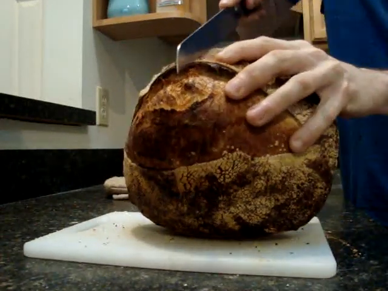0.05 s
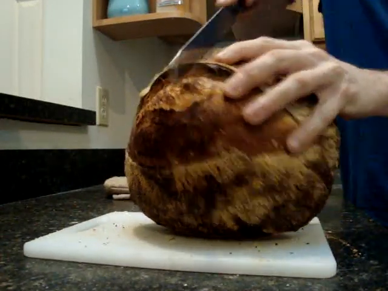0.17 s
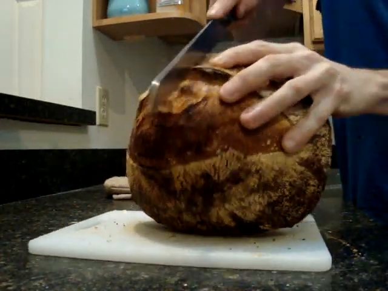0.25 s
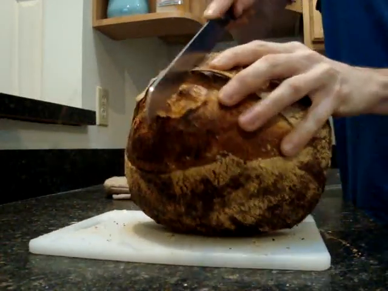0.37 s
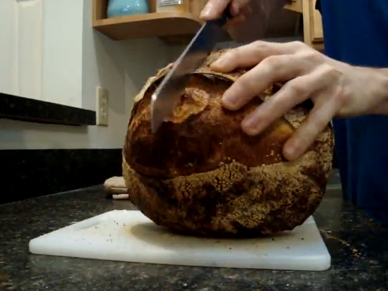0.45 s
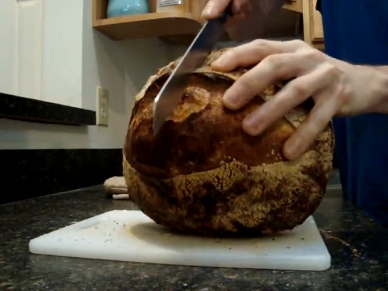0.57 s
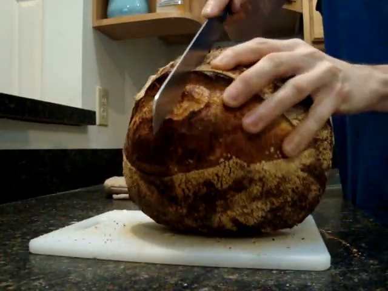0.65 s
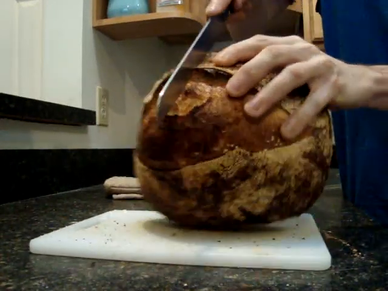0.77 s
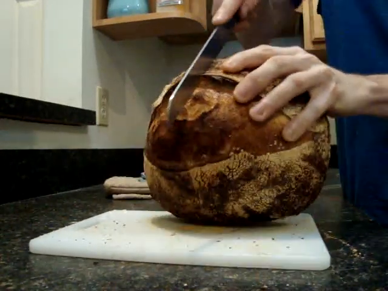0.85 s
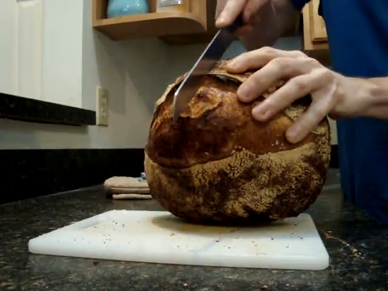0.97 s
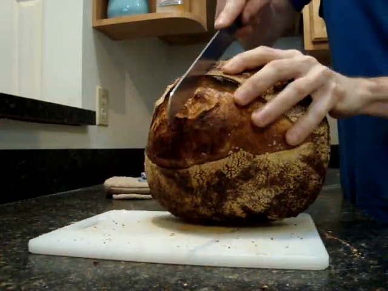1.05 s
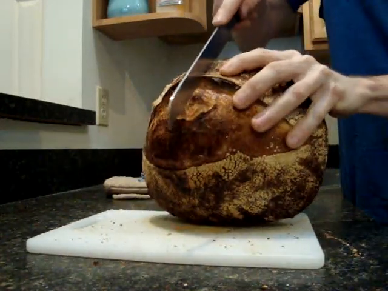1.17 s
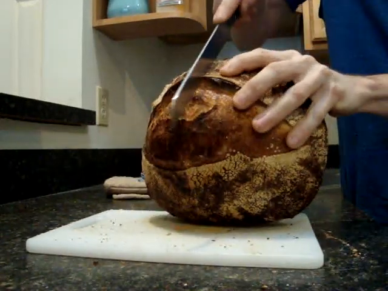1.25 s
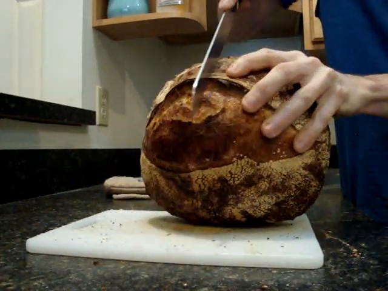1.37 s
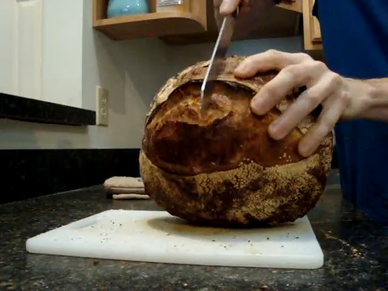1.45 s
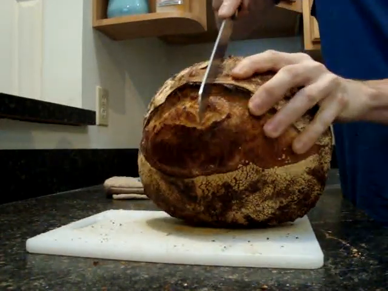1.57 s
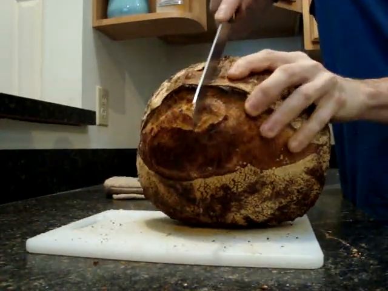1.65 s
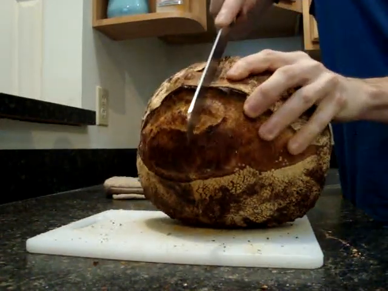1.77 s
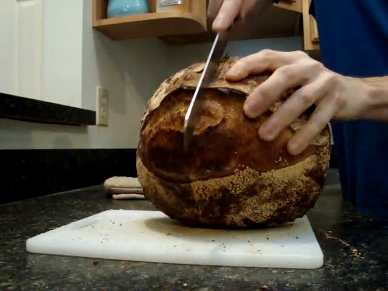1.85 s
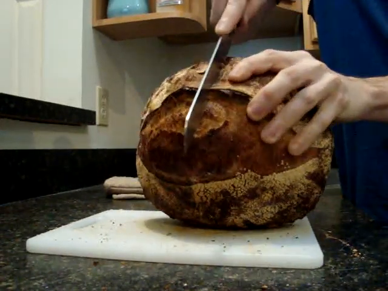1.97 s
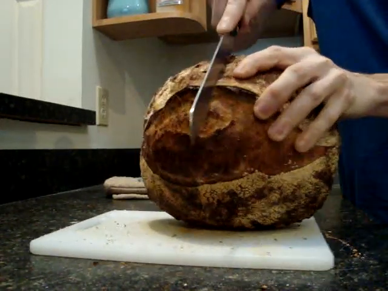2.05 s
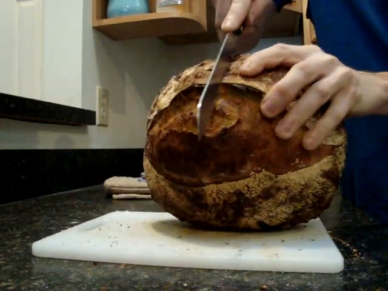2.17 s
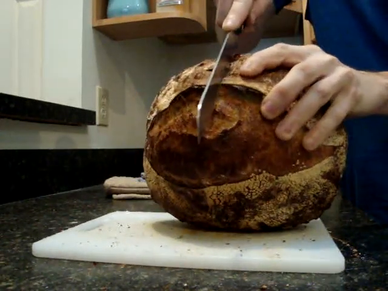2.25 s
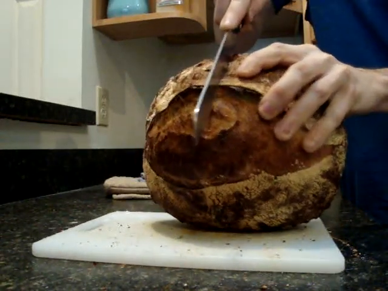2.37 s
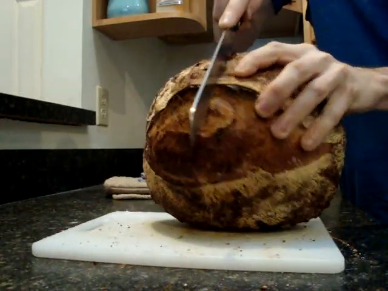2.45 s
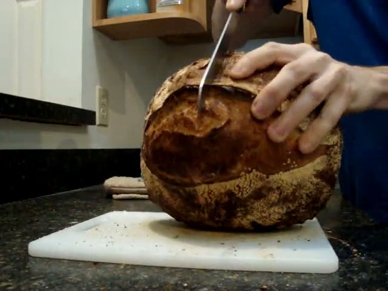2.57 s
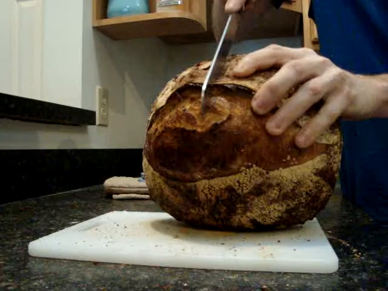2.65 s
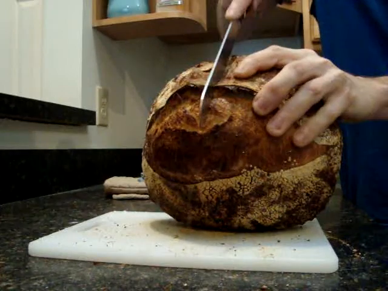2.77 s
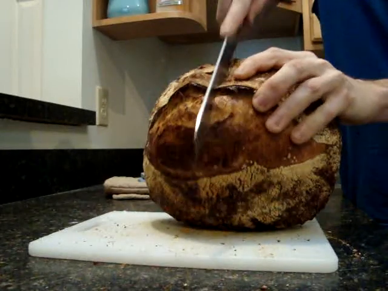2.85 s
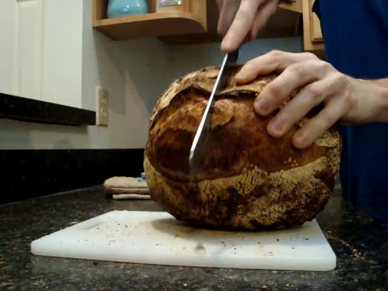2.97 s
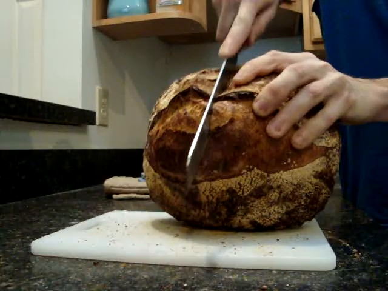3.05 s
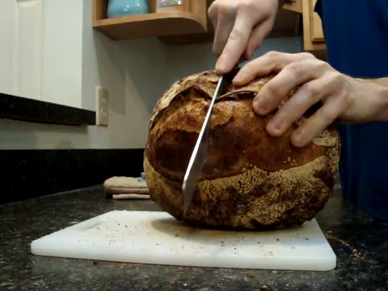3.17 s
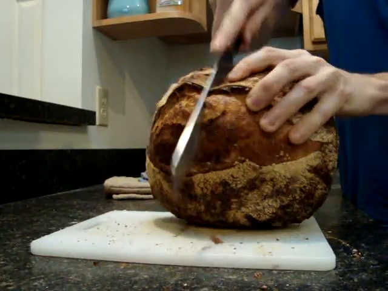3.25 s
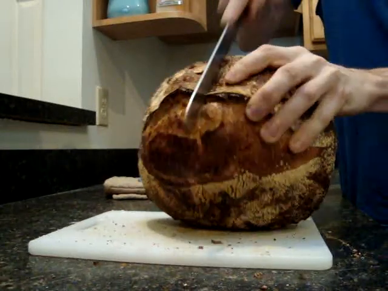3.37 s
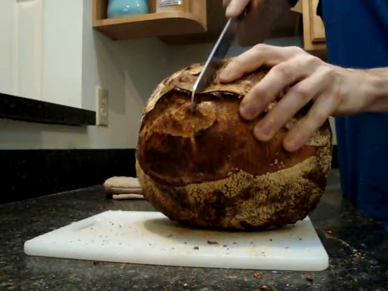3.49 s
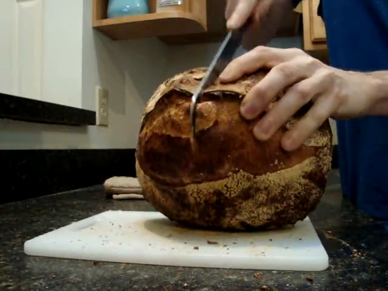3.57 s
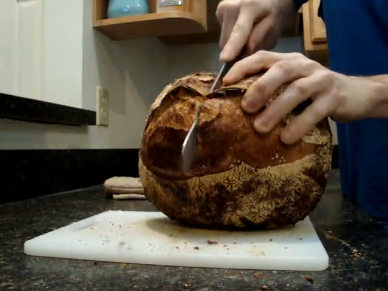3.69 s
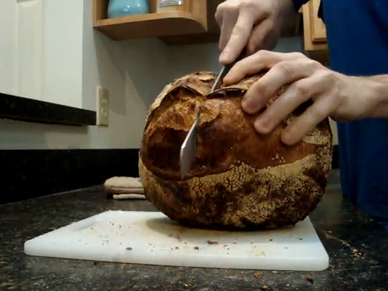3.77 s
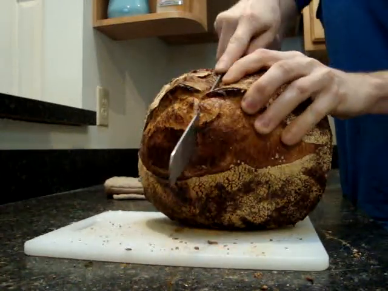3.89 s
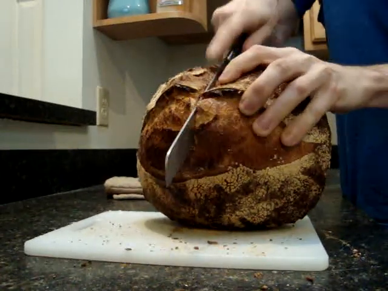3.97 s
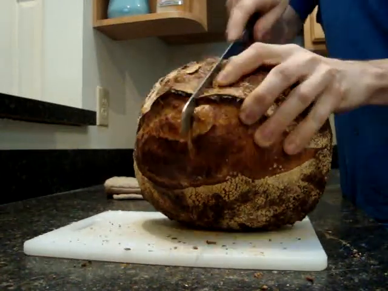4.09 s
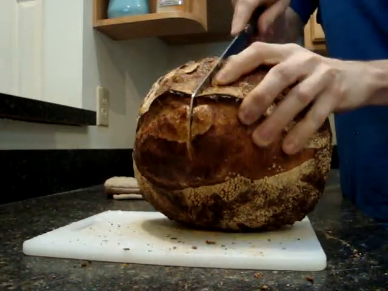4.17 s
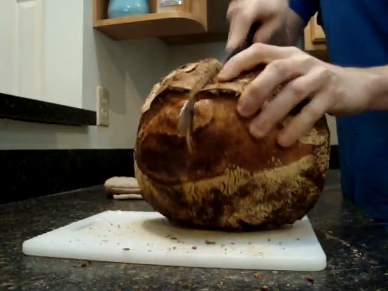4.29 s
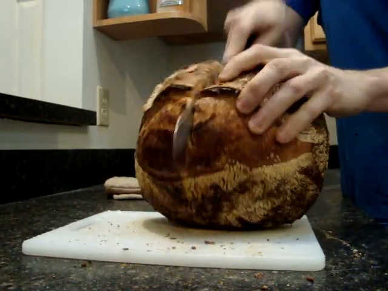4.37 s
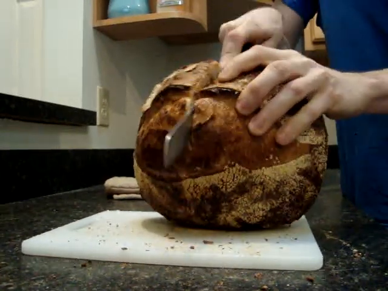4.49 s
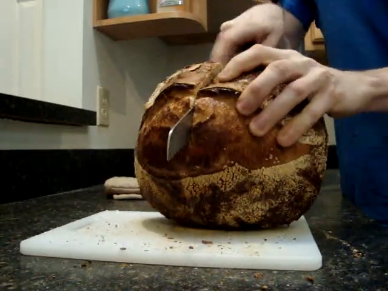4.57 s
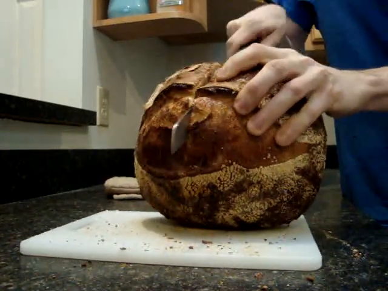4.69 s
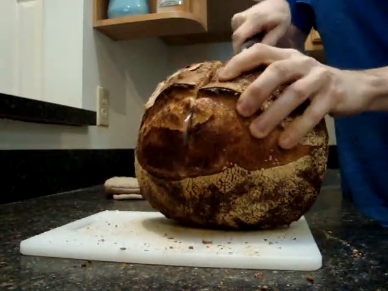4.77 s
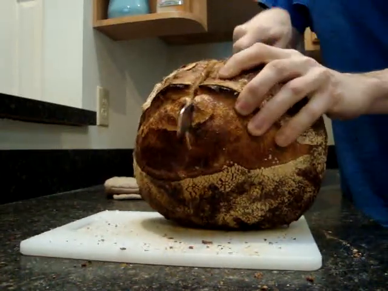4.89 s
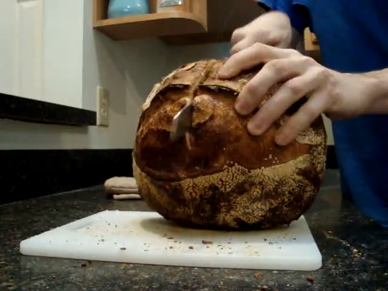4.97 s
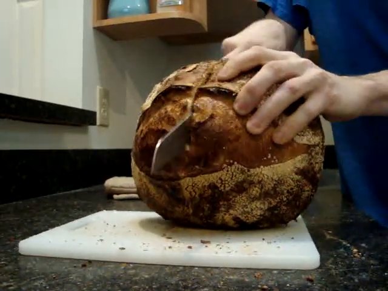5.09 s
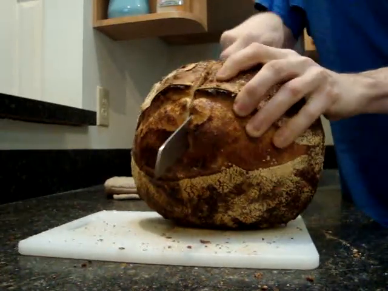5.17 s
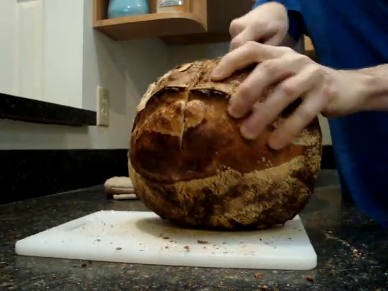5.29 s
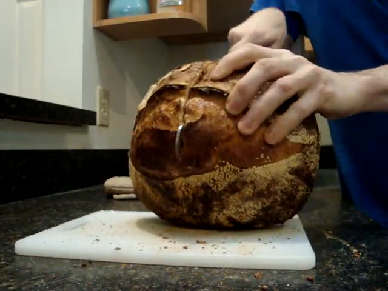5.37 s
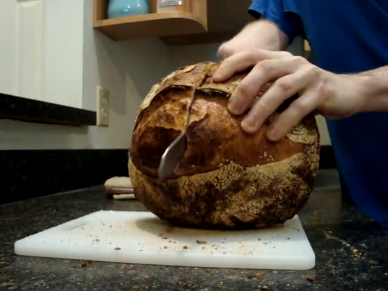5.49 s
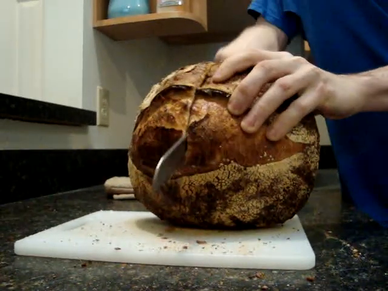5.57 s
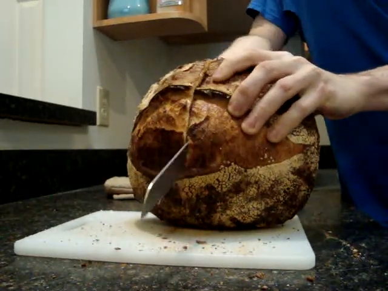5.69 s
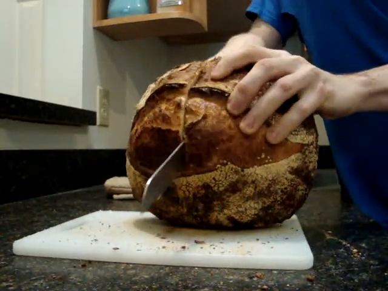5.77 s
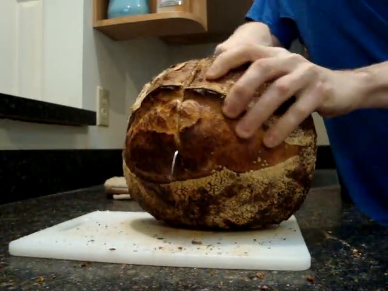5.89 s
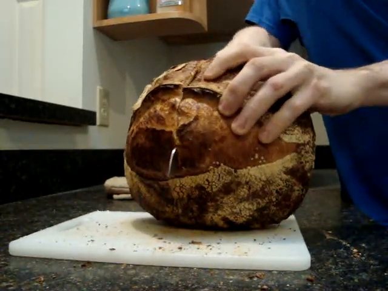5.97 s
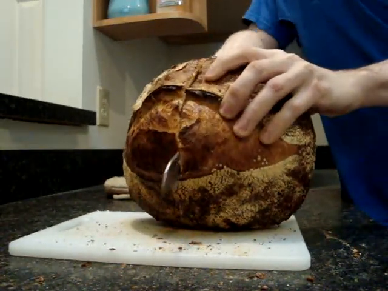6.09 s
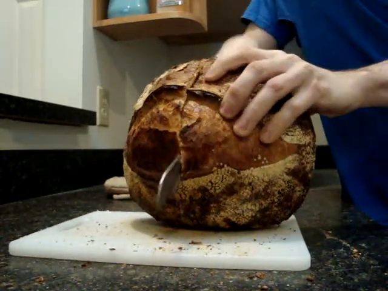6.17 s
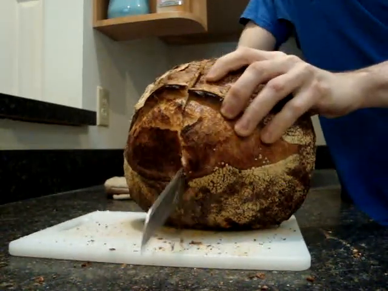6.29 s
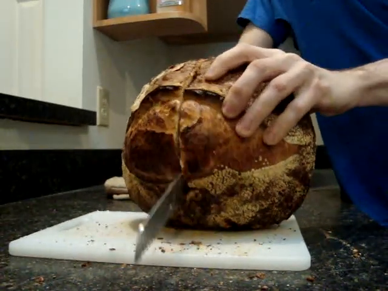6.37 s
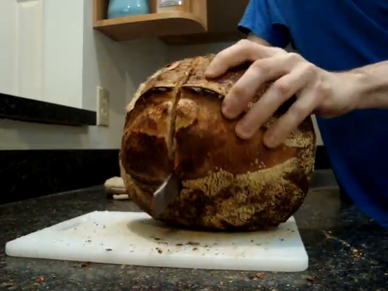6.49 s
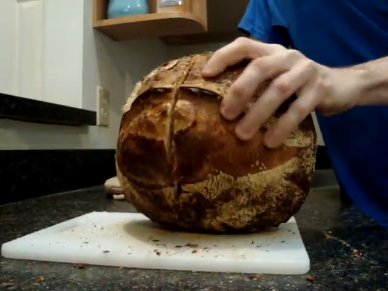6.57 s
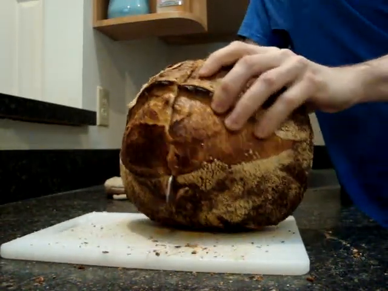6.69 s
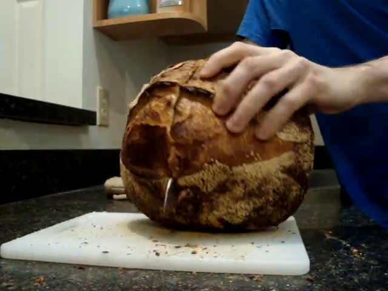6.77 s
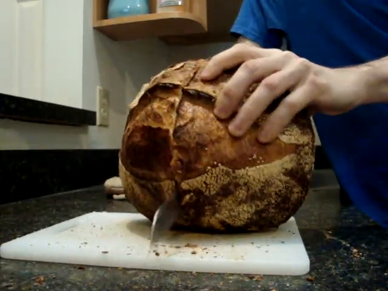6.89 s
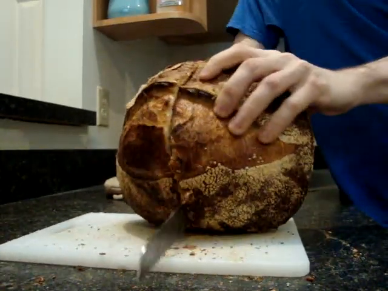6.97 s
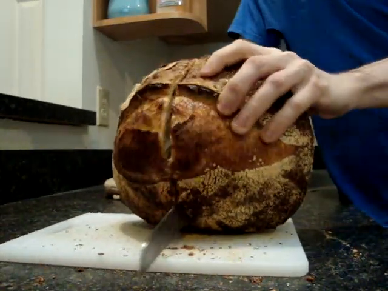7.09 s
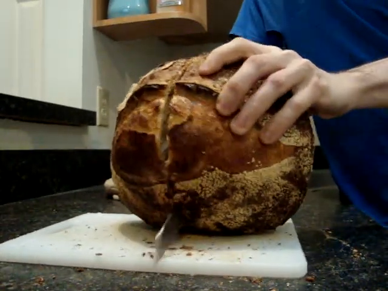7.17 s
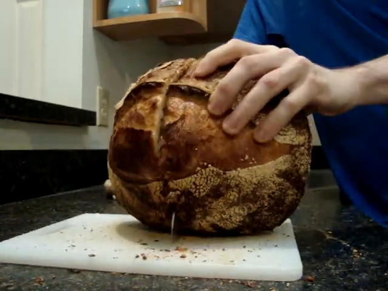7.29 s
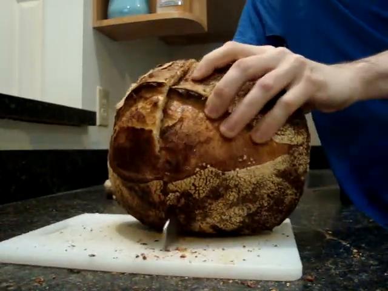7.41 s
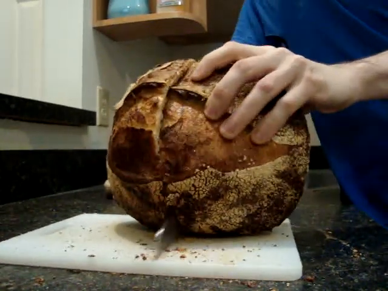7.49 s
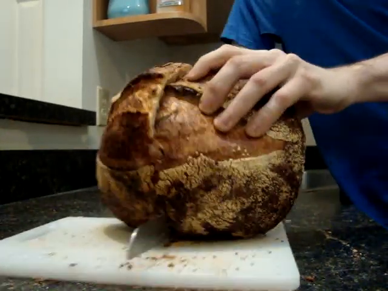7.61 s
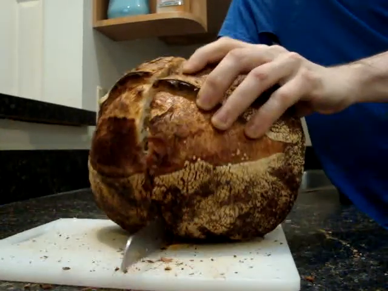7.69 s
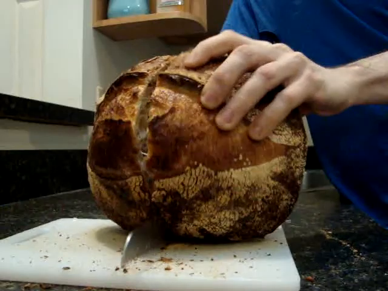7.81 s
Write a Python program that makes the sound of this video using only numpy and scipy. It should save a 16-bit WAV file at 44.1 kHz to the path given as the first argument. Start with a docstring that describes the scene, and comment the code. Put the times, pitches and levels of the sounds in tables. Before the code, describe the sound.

A serrated knife cuts a hard-crusted loaf on a plastic board, heard close in a small quiet kitchen. Sharp cracks and soft knocks open it, then a light bright scrape thins out. Firmer sawing strokes follow, crunching with board rumble. Later the cracks get louder and the cutting duller, with one tiny squeak, continuing to the end over faint hush.

```python
"""A serrated knife saws through a hard-crusted loaf on a plastic board in a small quiet kitchen.
It opens with sharp cracks and knocks on the board, then skates brightly: random fractures, gated by tooth bites,
ring patches of crust and feed a crackle of noise bands. From 1.3 s firmer strokes swell over a noise-fed board rumble.
At 3.8 s the blade sings briefly on a narrow mode; from 4.3 s the cracks (spike, ring, snap) grow louder, the cut duller.
At 5.2 s a wavering tone squeaks; sawing goes on to the end. Hush and short delay-loop echoes lie under it all."""
import sys
import numpy as np
from scipy import signal
from scipy.io import wavfile
from scipy.ndimage import uniform_filter1d

SR = 44100
rng = np.random.default_rng(int(sys.argv[2]) if len(sys.argv) > 2 else 0)


def gain_from_db(level_db):
    """Turn a decibel level (scalar or array-like) into a linear amplitude factor."""
    decades = np.asarray(level_db, float) / 20
    return 10 ** decades


def unload_audio(sound):
    """Save the sound as a 16-bit wav file, at the path given as the first command line argument."""
    columns = np.transpose(np.atleast_2d(sound))
    # keep every value between -1 and 1, then stretch to whole-number steps
    steps = np.round(np.clip(columns, -1, 1) * 32767)
    wavfile.write(sys.argv[1], SR, steps.astype(np.int16))


N = 345744

# background hush spectrum: (frequency [Hz], relative gain [dB])
HUSH_SPECTRUM = [(40, -33.5), (359, -9), (496, -2.5), (570, -9), (1090, -4.5), (10000, -39)]
# board modes: (frequency [Hz], width [Hz], relative level [dB])
BOARD_MODES = [(87, 95, -14.5), (134.4, 86, -2), (200.6, 120, 7), (272.5, 97, 4)]
# loaf knocks on the board: (time [s], relative strength [dB])
KNOCKS = [(0.316, -57), (0.345, -66), (0.411, -60), (0.519, -66), (0.757, -60), (1.978, -59), (6.184, -48)]
# blade modes: (frequency [Hz], width [Hz], level re ringing crust [dB])
BLADE_MODES = [(1637, 45, -13.5), (2795, 38, -22.5)]
# squeak of the blade in the cut: (time [s], pitch [Hz], level [dB])
SQUEAK_PATH = [(5.225, 560, -52), (5.252, 697, -39), (5.275, 1035, -30.5), (5.315, 902, -32.5),
               (5.335, 816, -55)]
# single crust cracks: (time [s], relative strength [dB], pitch [Hz])
CRUST_CRACKS = [(0.022, -13.5, 1020), (0.052, -15, 620), (0.157, -12.5, 1000), (0.316, -21, 2500),
                (0.402, -21, 2310), (0.413, -18.5, 2000), (0.455, -26, 3000), (0.476, -27, 2500),
                (0.528, -29.5, 636), (0.609, -34, 1660), (0.637, -37, 2500), (0.694, -34, 767),
                (0.753, -30.5, 1000), (0.884, -35.5, 643), (1.458, -23.5, 970), (1.498, -25, 2000),
                (1.566, -21.5, 2200), (1.6132, -15, 2000), (1.69, -16, 990), (1.828, -17, 1150),
                (1.937, -16, 2020), (2.324, -30, 2190), (2.585, -18.5, 740), (2.699, -21.5, 896),
                (2.776, -9.5, 1400), (2.844, -21, 3000), (3.101, -14, 1040), (3.543, -21.5, 640),
                (3.575, -17, 800), (3.624, -19.5, 1180), (3.685, -17, 1290), (3.7915, -23, 2500),
                (3.808, -17, 1500), (3.832, -14, 1400), (3.839, -19, 1500), (3.853, -16.5, 1380),
                (3.918, -23, 1500), (4.3281, -8.5, 1500), (4.35, -7.5, 1400), (4.379, -10.5, 890),
                (4.3939, -11, 1600), (4.911, -22, 1350), (4.962, -13.5, 665), (5.041, -16, 845),
                (5.3444, -23, 930), (5.408, -19, 1030), (5.455, -12.5, 656), (5.474, -16, 900),
                (5.699, -19.5, 1500), (5.771, -21.5, 1200), (5.852, -15.5, 900), (6.139, -16, 825),
                (6.185, -9, 1300), (6.212, -8.5, 1570), (6.248, -12, 1100), (6.533, -11, 760),
                (6.742, -15, 1500), (6.809, -19, 865), (6.94, -16, 740), (7.127, -14.5, 990),
                (7.276, -16, 910), (7.465, -10.5, 1160), (7.757, -28, 1200), (7.78, -16, 1350)]
# crackle spectrum of the crust surface: (frequency [Hz], relative gain [dB])
CRACKLE_SPECTRUM = [(1470, -20.5), (2500, 7), (2810, 4), (3320, 5), (9600, -3)]
# ringing of the loaf's crust patches: (frequency [Hz], relative gain [dB])
LOAF_RESPONSE = [(372, -10.5), (467, 3), (847, 4), (1650, -5), (2100, -7), (3500, -14)]
# course of the cut: (time [s], crust pitch under firm touch [Hz], crackle balance re crunch [dB],
# resting-blade drive [dB], lean on the board at a firm stroke [dB])
CUT_COURSE = [(0, 1180, -2, -60, -50), (0.2, 1110, -0.5, -60, -66), (0.6, 1150, 4, -59, -54),
              (1.3, 680, -5.5, -64.5, -49.5), (1.75, 1070, -2, -39, -63), (2.1, 1110, -1.5, -58, -47),
              (2.9, 1004, -3.5, -53.5, -57.5), (3.4, 900, -2.5, -47.5, -54), (3.7, 1180, -1.5, -55.5, -55),
              (4.1, 1020, -11, -59, -55), (4.37, 1340, -7.5, -51.5, -55), (5.02, 820, -11.5, -52.5, -56),
              (5.55, 940, -6.5, -43, -50.5), (5.87, 970, -8, -53, -51), (6.22, 1240, -7.5, -54, -52.5),
              (6.52, 790, -6, -53, -53.5), (6.9, 1650, -8.5, -53, -50.5), (7.2, 990, -23, -50, -59),
              (7.55, 1350, -10, -52.5, -57.5), (7.84, 1030, -14, -46.5, -55)]
# blade bites, one or more to a push or pull:
# (time of full bite [s], swell [s], hold [s], fade [s], drive level [dB])
BLADE_STROKES = [(0.0, .05, 0.011, 0.1, -32.5), (0.089, 0.14, 0.034, .014, -42.5),
                 (0.157, 0.0066, 0.071, 0.018, -22.5), (0.243, 0.054, 0.041, 0.12, -36),
                 (0.5, 0.29, 0.03, 0.032, -43.5), (1.308, 0.12, 0.0067, 0.077, -28.5),
                 (1.514, 0.12, .005, 0.088, -40.5), (1.727, 0.088, 0.022, .02, -21.5),
                 (1.824, 0.02, 0.027, 0.031, -25.5), (1.937, 0.056, 0.043, 0.094, -37.5),
                 (2.51, 0.045, 0.068, 0.074, -27.5), (2.703, 0.057, 0.005, 0.047, -31.5),
                 (2.796, 0.032, 0.014, 0.056, -25), (2.912, 0.085, .012, 0.07, -17.5),
                 (3.033, 0.13, 0.013, .07, -25), (3.098, 0.072, 0.046, 0.033, -28),
                 (3.374, 0.049, 0.062, 0.089, -26), (3.582, 0.085, 0.044, 0.16, -35.5),
                 (3.688, 0.11, 0.053, 0.022, -25), (3.762, .05, .02, 0.069, -39.5),
                 (3.838, 0.019, .005, 0.16, -32), (4.066, 0.076, 0.093, 0.13, -33.5),
                 (4.32, 0.028, 0.018, 0.12, -25), (4.381, 0.06, 0.017, 0.11, -22.5),
                 (4.594, 0.2, 0.0043, 0.074, -38.5), (4.687, 0.058, .004, 0.051, -38),
                 (4.763, 0.068, 0.065, 0.067, -38.5), (4.916, 0.031, 0.053, .15, -29),
                 (4.997, 0.079, 0.053, 0.072, -19.5), (5.286, 0.42, .005, 0.14, -35),
                 (5.409, 0.058, 0.0049, 0.04, -32.5), (5.46, .02, 0.21, 0.045, -26),
                 (5.847, 0.097, 0.014, 0.14, -26.5), (6.148, 0.096, 0.13, 0.096, -26.5),
                 (6.446, 0.038, 0.044, .15, -35.5), (6.528, 0.096, .005, .14, -31.5),
                 (6.748, 0.066, 0.092, 0.16, -32.5), (6.927, 0.22, .005, 0.13, -22),
                 (7.155, 0.048, 0.098, 0.14, -33.5), (7.252, 0.16, 0.04, 0.027, -29),
                 (7.42, 0.085, .005, .1, -34), (7.467, 0.033, 0.078, 0.16, -22),
                 (7.774, 0.12, 0.0045, .25, -43)]

HUSH_DB = -53.5
KITCHEN_T60_S, WALL_CUT_HZ, KITCHEN_DB = 0.27, 4600, -19.5
BOARD_DB_PER_STROKE_DB, BOARD_SMOOTH_S = 1, 0.086
SING_START_S, SING_LENGTH_S, SING_START_DB, SING_FALL_DB_PER_S = 3.83, 0.076, -39, 70
TEETH_PER_S, GRAINS_PER_S = 84, 1500
SLOPE_DB = 20   # gained over one swell time, lost over one fade time
FIRM_DB = -25   # drive level of a firm stroke
LIGHT_PITCH_RISE_PER_DB = 0.1   # fraction of pitch per dB below firm
CRACK_SAMPLES = 1024
TIME_S = np.arange(N) / SR


def rms_one(x):
    """Scale to rms 1."""
    return x / np.sqrt(np.mean(x ** 2) + 1e-20)


def level_even(x, window_s):
    """Divide by the running rms."""
    return x / np.sqrt(uniform_filter1d(x ** 2, int(window_s * SR)) + 1e-12)


def at_hz(points, hz):
    """Read a spectrum table on a log-frequency axis."""
    table_hz, db = np.transpose(points)
    return np.interp(np.log(hz), np.log(table_hz), db)


def in_time(rows):
    """Interpolate table columns to sample rate."""
    s, *columns = np.transpose(rows)
    return [np.interp(TIME_S, s, column) for column in columns]


def drift(rate_hz):
    """Slow random variation: smoothed coarse noise, rms about 1."""
    coarse = np.convolve(rng.standard_normal(int(N / SR * rate_hz * 4) + 8), np.hanning(7), "valid")
    return np.interp(np.linspace(0, len(coarse) - 1, N), np.arange(len(coarse)), rms_one(coarse))


def resonance(x, hz, width_hz):
    """Two-pole band-pass, gain about 1 at its peak."""
    r = np.exp(-np.pi * width_hz / SR)
    numerator = [(1 - r * r) / 2, 0, (r * r - 1) / 2]
    denominator = [1, -2 * r * np.cos(2 * np.pi * hz / SR), r * r]
    return signal.lfilter(numerator, denominator, x + 1e-18)


def coloured(x, spectrum, flicker_db=0):
    """Parallel third-octave bands of alternating sign, each flickering on its own."""
    out, edges_hz = 0, 40 * 2 ** (np.arange(25) / 3)
    for k, (low_hz, high_hz) in enumerate(zip(edges_hz, edges_hz[1:])):
        gain = gain_from_db(at_hz(spectrum, np.sqrt(low_hz * high_hz)) + flicker_db * drift(45))
        band = signal.butter(2, [low_hz, high_hz], "band", fs=SR, output="sos")
        out = out + (-1) ** k * gain * signal.sosfilt(band, x)
    return rms_one(out)


def hush():
    """Steady background: coloured noise."""
    return gain_from_db(HUSH_DB) * coloured(rng.standard_normal(N), HUSH_SPECTRUM)


def kitchen(x):
    """Room answer: ten feedback delays, duller on every round, stepped block by block."""
    out, dull = np.zeros(N), np.exp(-2 * np.pi * WALL_CUT_HZ / SR)
    lags = (np.geomspace(.011, .037, 10) * SR).astype(int)
    for k, lag in enumerate(lags):
        loop, state = x.copy(), [0.]
        gain = gain_from_db(-60 * lag / SR / KITCHEN_T60_S)
        for i in range(lag, N, lag):
            back, state = signal.lfilter([gain * (1 - dull)], [1, -dull], loop[i - lag:i], zi=state)
            loop[i:i + lag] += back[:N - i]
        out += (loop - x) * (-1) ** k
    return gain_from_db(KITCHEN_DB) * out


def board(crunch_db, lean_db):
    """Loaf rocks on the board: noise through board modes, swelling with each stroke."""
    stroke_db = uniform_filter1d(crunch_db, int(BOARD_SMOOTH_S * SR)) - FIRM_DB
    shake = rng.standard_normal(N)
    rumble = 0
    for hz, width_hz, db in BOARD_MODES:
        mode = resonance(resonance(shake, hz, width_hz), hz, width_hz)
        rumble = rumble + gain_from_db(db) * rms_one(mode)
    return gain_from_db(lean_db + BOARD_DB_PER_STROKE_DB * stroke_db) * rumble


def jolts(knock_hz):
    """Knocks on the board: each one a blunt low-passed push, no ring."""
    pushes = np.zeros(N)
    for s, strength_db in KNOCKS:
        pushes[round(s * SR)] = gain_from_db(strength_db + 8.5) * SR / knock_hz / 2
    return signal.sosfilt(signal.butter(2, knock_hz, fs=SR, output="sos"), pushes + 1e-18)


def sing(torn):
    """Fractures feed one narrow upper mode of the dragged blade, ever more faintly."""
    since_s = TIME_S - SING_START_S
    sounding = (since_s > 0) & (since_s < SING_LENGTH_S)
    level_db = SING_START_DB - SING_FALL_DB_PER_S * np.maximum(since_s, 0)
    hz, width_hz, _ = BLADE_MODES[1]
    return sounding * gain_from_db(level_db) * rms_one(resonance(torn, hz, width_hz))


def squeak():
    """Fast stick-slip of steel on crumb: wavering tone with two weak, broken overtones."""
    pitch_hz, level_db = in_time(SQUEAK_PATH)
    phase = 2 * np.pi * np.cumsum(pitch_hz * (1 + 0.024 * drift(70))) / SR
    sounding = (TIME_S > SQUEAK_PATH[0][0]) & (TIME_S < SQUEAK_PATH[-1][0])
    tone = np.sin(phase)
    for overtone in (2, 3):
        tone = tone + (.2 + .15 * drift(150)) * np.sin(overtone * phase)
    return sounding * gain_from_db(level_db + 4.0 * drift(120)) * tone


def cracks(crackle_db, cycles, snap_s):
    """Each crack: sharp spike, short ring at its pitch, snap following the crackle balance."""
    out, t = np.zeros(N + CRACK_SAMPLES), np.arange(CRACK_SAMPLES) / SR
    treble = signal.butter(2, 3500, "high", fs=SR, output="sos")
    for s, strength_db, hz in CRUST_CRACKS:
        hiss = rng.standard_normal(CRACK_SAMPLES)
        # low cracks go on splintering, high ones are thin ticks
        splinters = hiss * np.exp(-t * hz / 5.4) + 6.2 * (t == 0)
        body = resonance(splinters, hz, hz / cycles)
        body = body / np.abs(body).max()
        spike = np.sin(2 * np.pi * t * hz) * np.exp(-t * hz * 2.5) * 2
        snap = signal.sosfilt(treble, hiss * np.exp(-t / snap_s))
        at = round(s * SR)
        crack = 0.75 * body + 0.45 * spike + gain_from_db(crackle_db[at] - 5.5) * snap
        out[at:at + CRACK_SAMPLES] += gain_from_db(strength_db) * crack
    return out[:N]


def blade_pings(snaps):
    """Cracks set the blade modes ringing."""
    return sum(gain_from_db(-db - 17.0) * resonance(snaps, hz, width_hz) for hz, width_hz, db in BLADE_MODES)


def effort(resting_db):
    """Crunch drive [dB]: bites swell, hold and fade over the faint drag of the resting blade."""
    power = gain_from_db(2 * resting_db)
    for s, swell_s, hold_s, fade_s, level_db in BLADE_STROKES:
        early = np.maximum(s - TIME_S, 0) / swell_s
        late = np.maximum(TIME_S - s - hold_s, 0) / fade_s
        power = power + gain_from_db(2 * (level_db - SLOPE_DB * np.minimum(early + late, 5)))
    return 10 * np.log10(power)


def bites(bite_s, rise_s, between_db):
    """Teeth catch at uneven moments; each bite swells quickly and dies away."""
    steps = np.clip(1 + .3 * rng.standard_normal(3000), .2, 3) * SR / TEETH_PER_S
    at = np.cumsum(steps).astype(int)
    force = gain_from_db(2.7 * rng.standard_normal(3000))
    teeth = np.zeros(N)
    teeth[at[at < N]] = force[at < N]
    fall, rise = np.exp(-1 / (bite_s * SR)), np.exp(-1 / (rise_s * SR))
    return signal.lfilter([1 - rise], np.convolve([1, -fall], [1, -rise]), teeth) + gain_from_db(between_db)


def clicks(per_s, spread_db):
    """Clicks at random moments, most small, a few large."""
    size_db = spread_db * np.minimum(rng.exponential(1, N), 3)
    return (rng.random(N) < per_s / SR) * gain_from_db(size_db)


def fractures(bite, spread_db, even_s):
    """Tiny fractures under each bite; a running rms evens the random grains, so the strokes set the loudness."""
    grains = clicks(GRAINS_PER_S, spread_db) * rng.choice([-1, 1], N) + 0.29 * rng.standard_normal(N)
    return level_even(bite * grains, even_s)


def crust_crackle(deep, shallow, crunch_db, crackle_db):
    """Surface fractures through flickering bands; light strokes scratch relatively brighter."""
    level_db = crunch_db + crackle_db - 2.0 - 0.18 * (crunch_db + 33.5)
    return gain_from_db(level_db) * coloured(shallow + 0.085 * deep, CRACKLE_SPECTRUM, flicker_db=2.6)


def loaf(torn, pitch_hz, cycles, focus_db, patchy_db):
    """Crust patches ring a few cycles, lifted near the pitch of the cut; the blade rings along."""
    patches = 0
    for hz in np.geomspace(450, 3200, 16):
        near = np.exp(-(np.log(hz / pitch_hz) / 0.5) ** 2)
        struck = torn * rng.choice([-1, 0, 1], N)   # every fracture reaches only some patches
        gain_db = at_hz(LOAF_RESPONSE, hz) + focus_db * near + patchy_db * drift(12)
        patches = patches + gain_from_db(gain_db) * resonance(struck, hz, hz / cycles)
    ringing = rms_one(patches)
    for hz, width_hz, db in BLADE_MODES:
        ringing = ringing + gain_from_db(db) * rms_one(resonance(torn, hz, width_hz))
    return level_even(ringing, .08)


def scene():
    """Sum the sawn bread, its room answer, the board and the hush."""
    firm_hz, crackle_db, resting_db, lean_db = in_time(CUT_COURSE)
    crunch_db = effort(resting_db)
    # a light touch sets smaller, higher patches ringing
    pitch_hz = firm_hz * (1 + LIGHT_PITCH_RISE_PER_DB * np.maximum(FIRM_DB - crunch_db, 0))
    # bright or light cutting is dense; dull, firm cutting lets the teeth stand apart
    between_db = -9 + .6 * crackle_db + .5 * (FIRM_DB - crunch_db)
    bite = bites(bite_s=.004, rise_s=.0005, between_db=between_db)
    deep = fractures(bite, spread_db=3.0, even_s=0.061)
    # surface crackle follows the teeth loosely
    shallow = fractures(bite + gain_from_db(-8.5), spread_db=4.5, even_s=0.031)
    crunch = gain_from_db(crunch_db - 1.5) * loaf(deep, pitch_hz, cycles=5.6, focus_db=7.0, patchy_db=3.6)
    crackle = crust_crackle(deep, shallow, crunch_db, crackle_db)
    snaps = cracks(crackle_db, cycles=3.0, snap_s=0.0054)
    bread = crunch + crackle + snaps + blade_pings(snaps) + squeak() + sing(shallow)
    mix = bread + kitchen(bread) + board(crunch_db, lean_db) + jolts(knock_hz=200) + hush()
    return mix[None]


def band_limit(x):
    """A steep low-pass at the top of the band."""
    return signal.sosfilt(signal.butter(12, 11140, fs=SR, output="sos"), x)


def record(dry):
    """Microphone loses the deepest bass, the counter under it cancels a low band; the top is cut steeply."""
    thin = signal.sosfilt(signal.butter(2, 62, "high", fs=SR, output="sos"), dry)
    thin = thin - 0.46 * resonance(thin, 352, 100)
    mix = signal.sosfilt(signal.cheby2(16, 38, 10250, fs=SR, output="sos"), thin)
    return band_limit(mix)


dry = scene()
out = record(dry)
unload_audio(out)
```